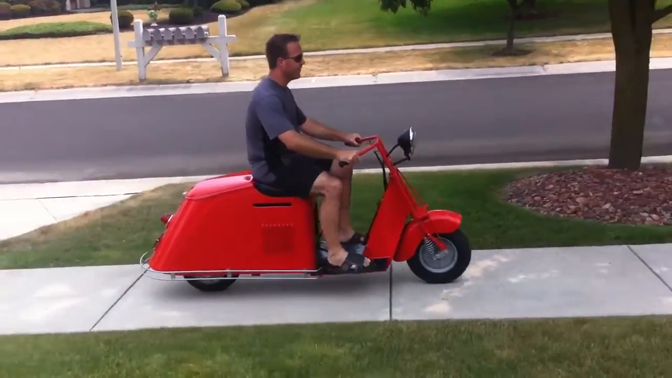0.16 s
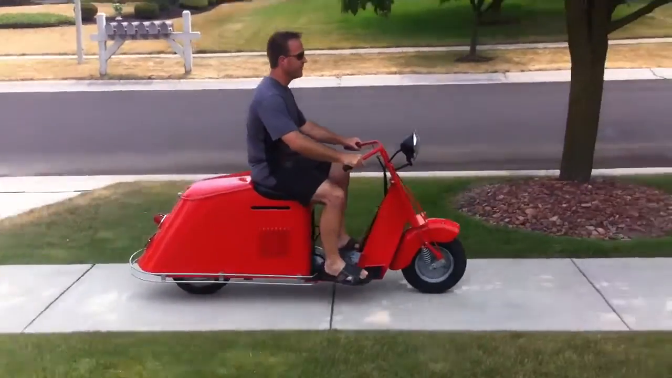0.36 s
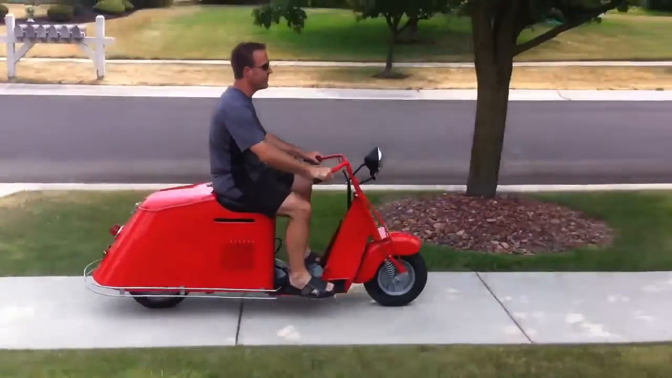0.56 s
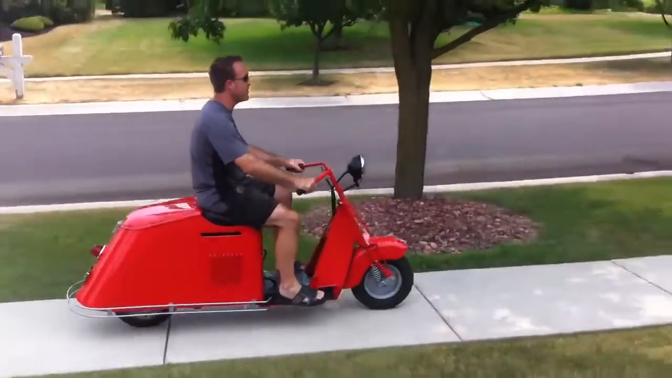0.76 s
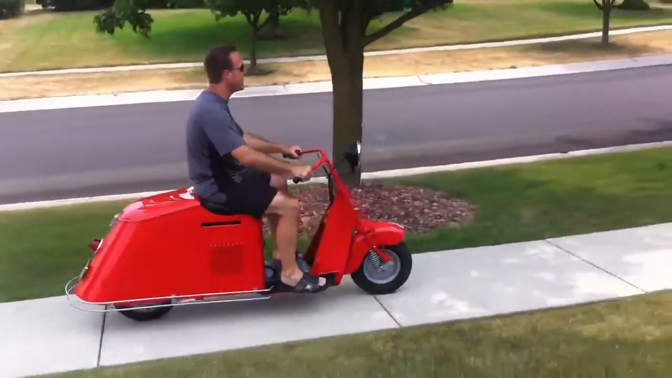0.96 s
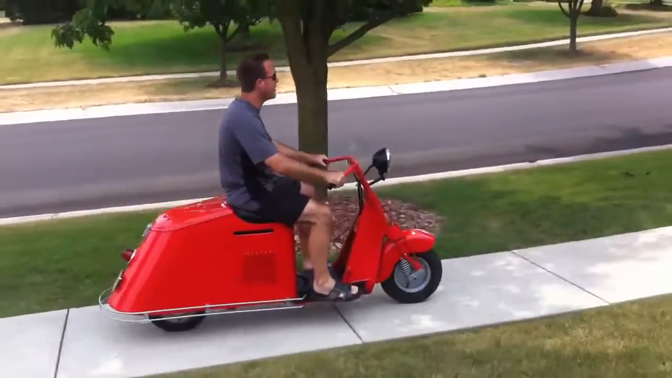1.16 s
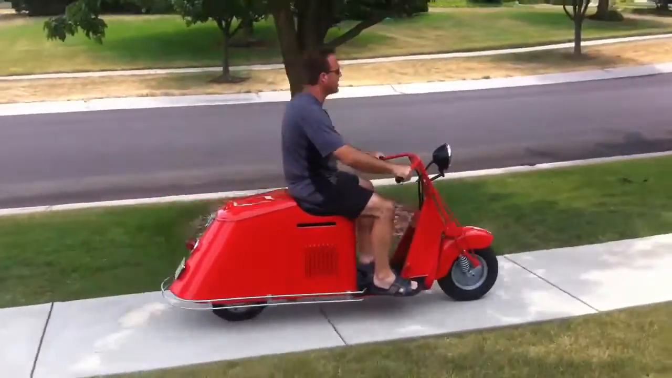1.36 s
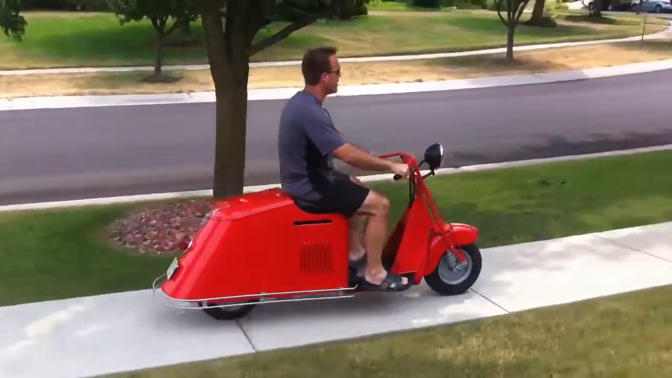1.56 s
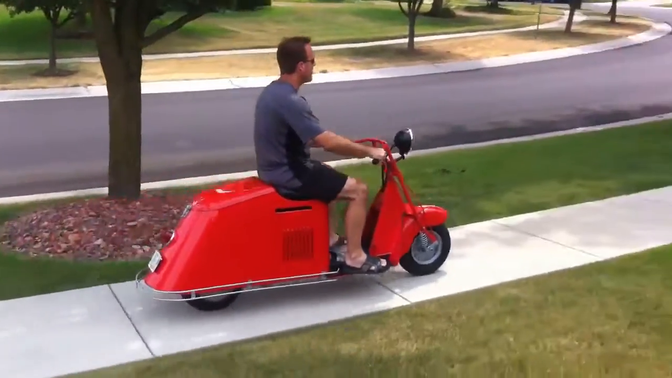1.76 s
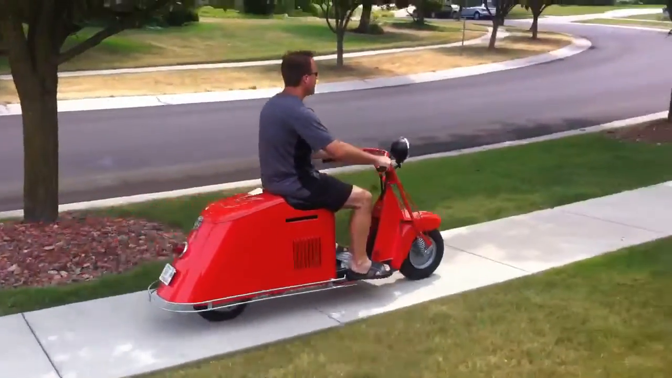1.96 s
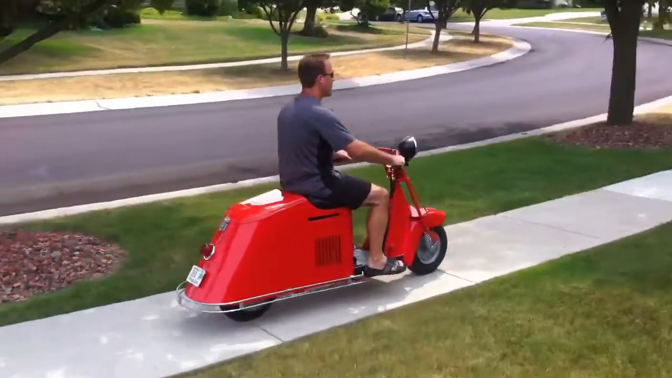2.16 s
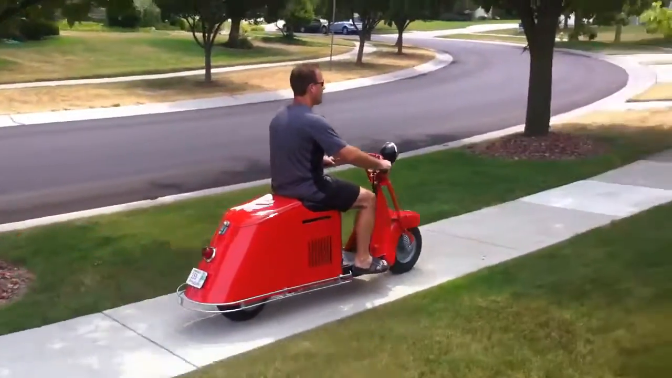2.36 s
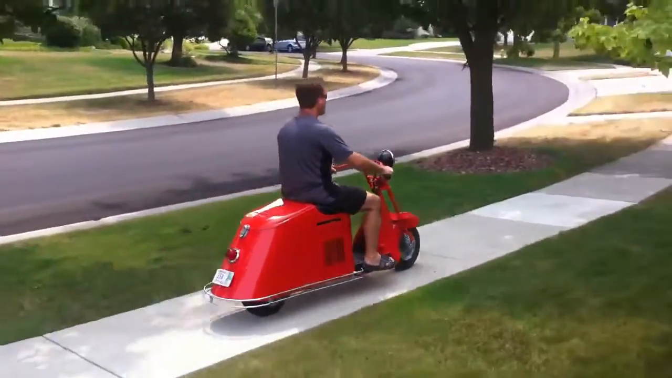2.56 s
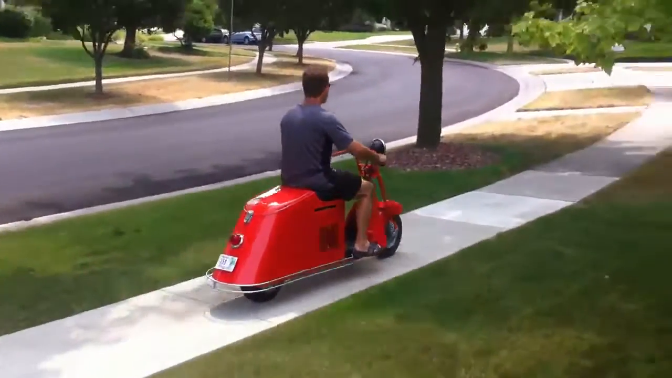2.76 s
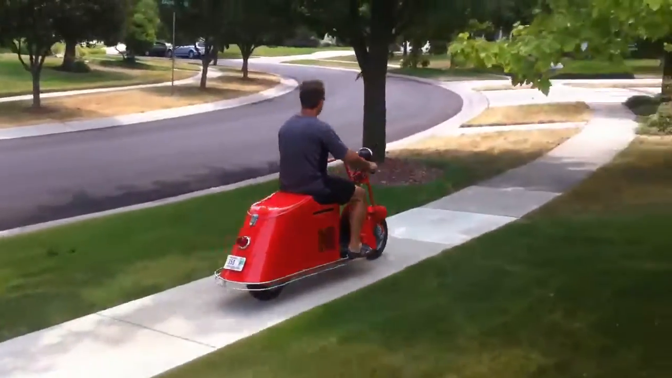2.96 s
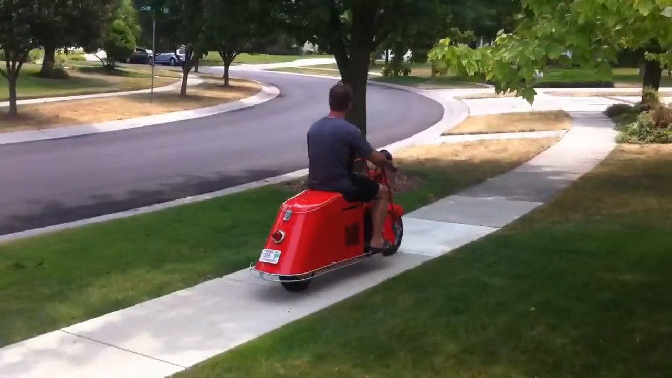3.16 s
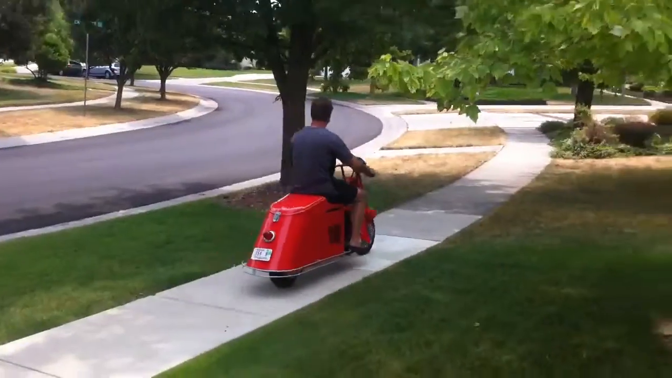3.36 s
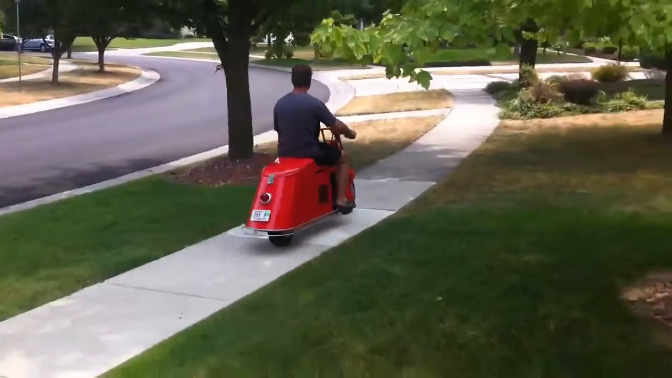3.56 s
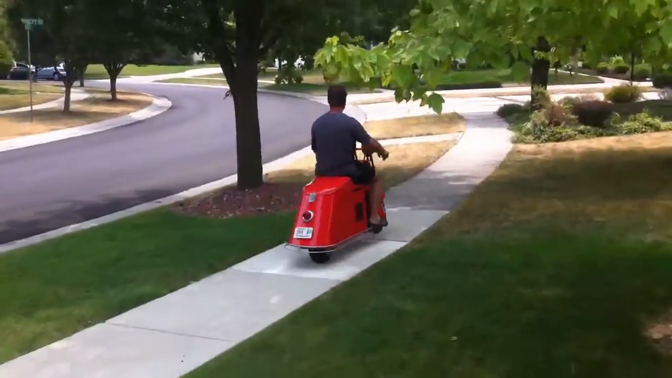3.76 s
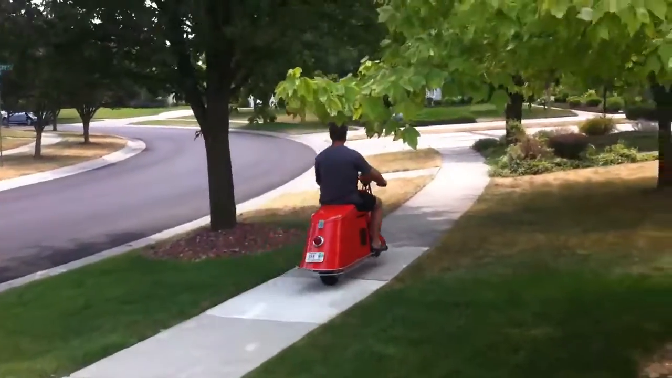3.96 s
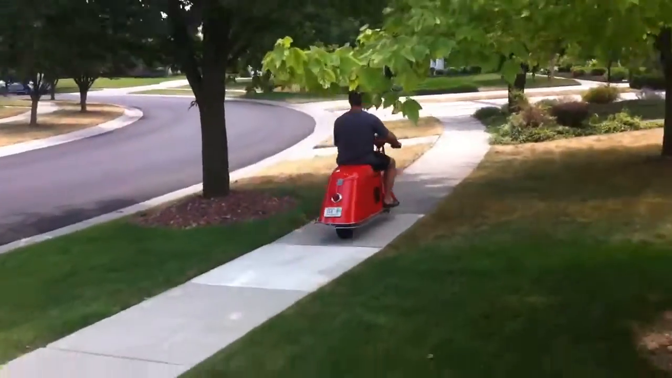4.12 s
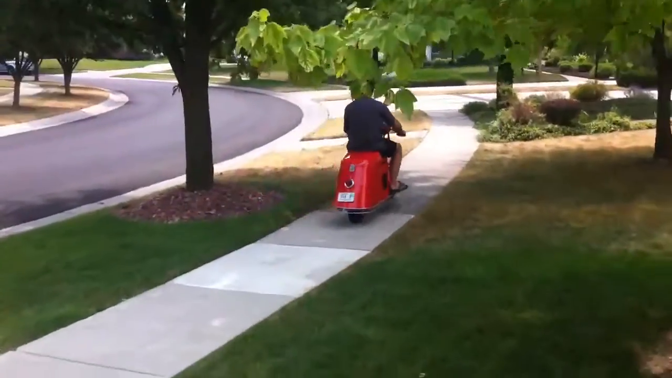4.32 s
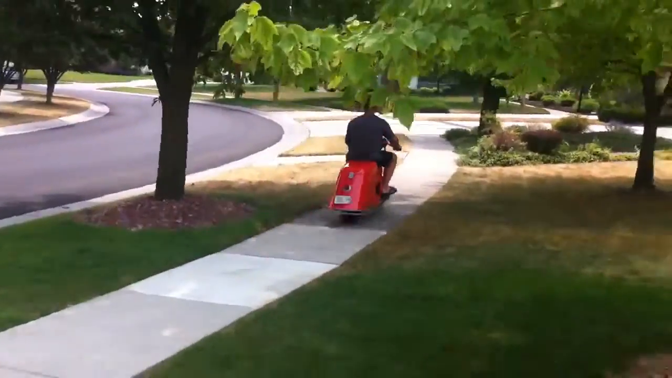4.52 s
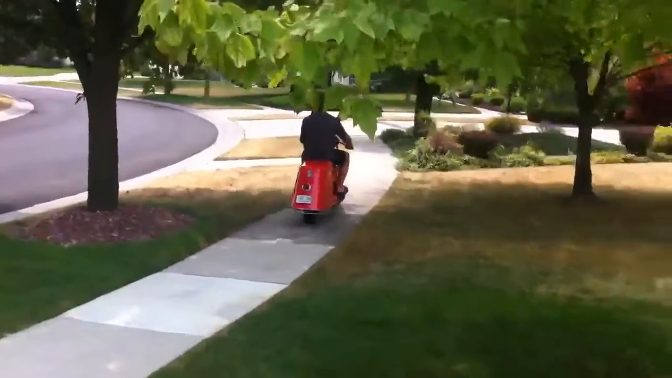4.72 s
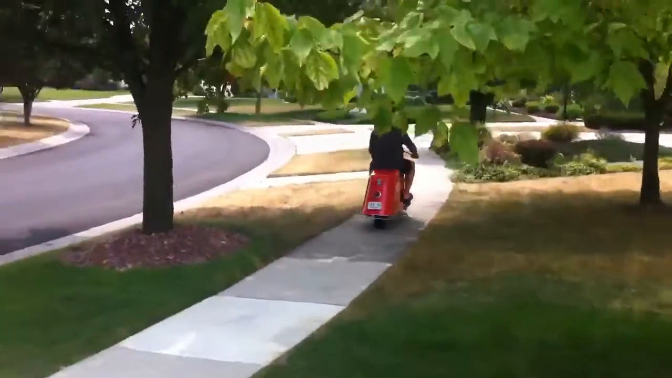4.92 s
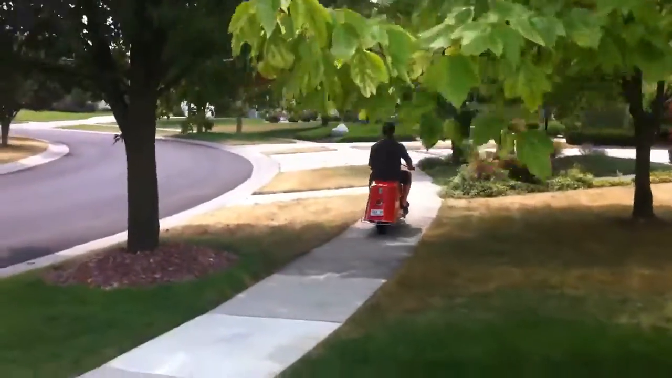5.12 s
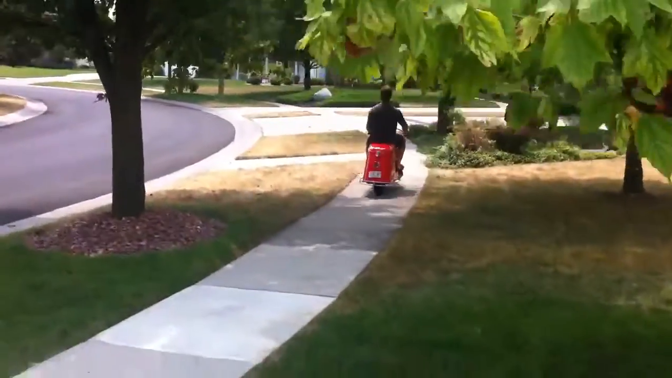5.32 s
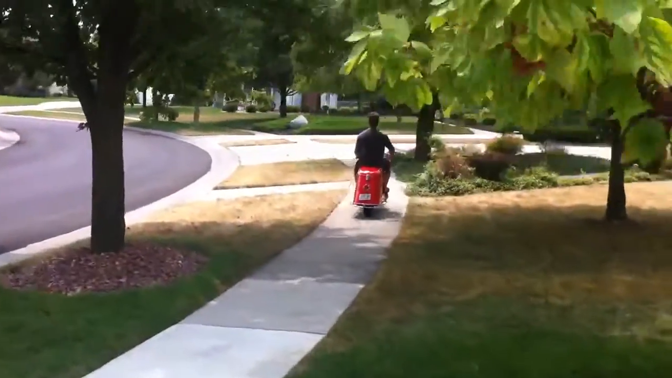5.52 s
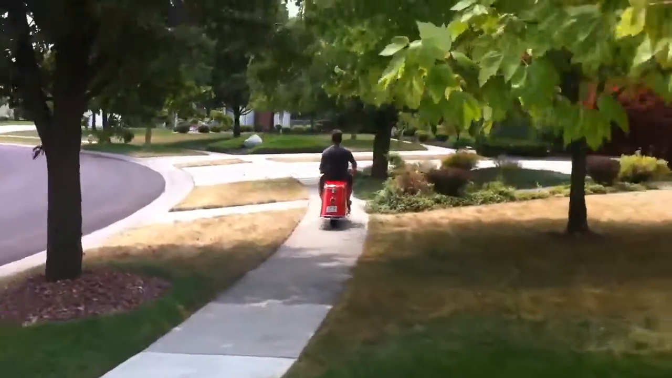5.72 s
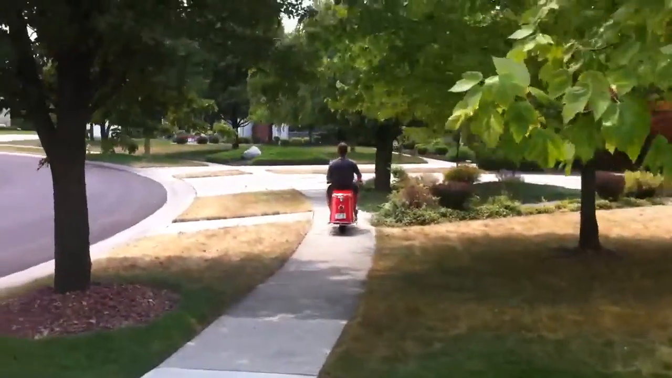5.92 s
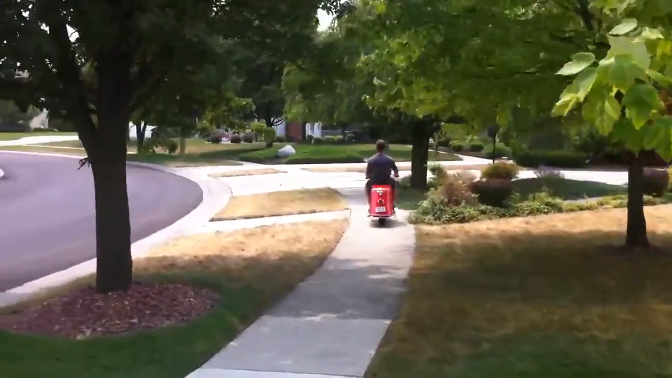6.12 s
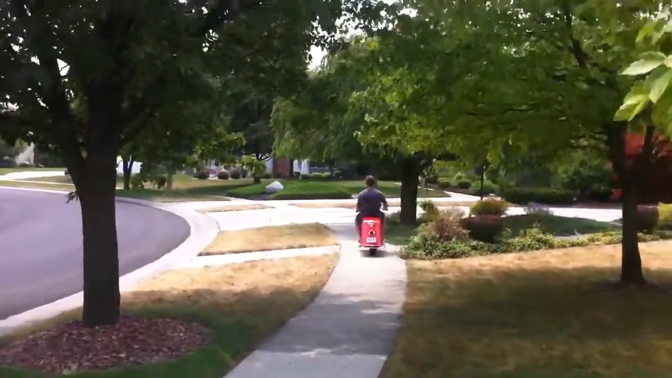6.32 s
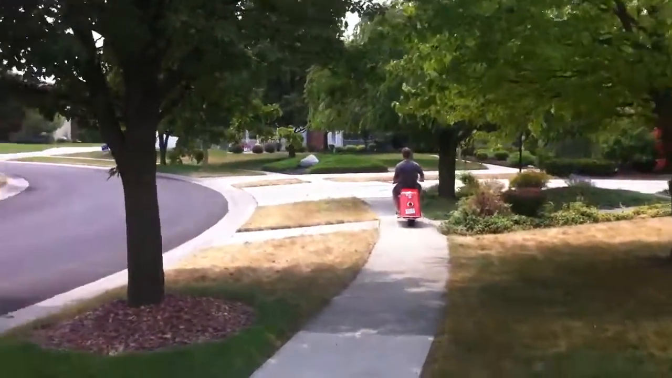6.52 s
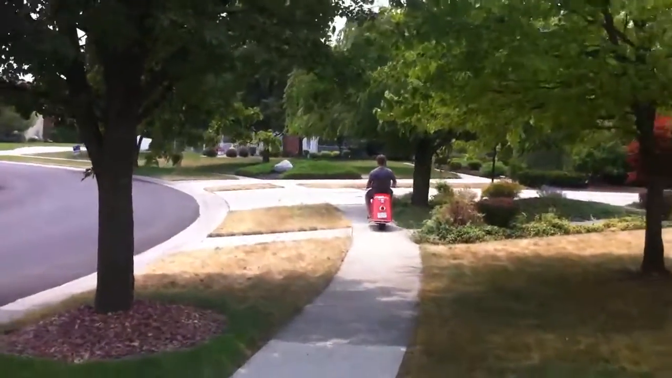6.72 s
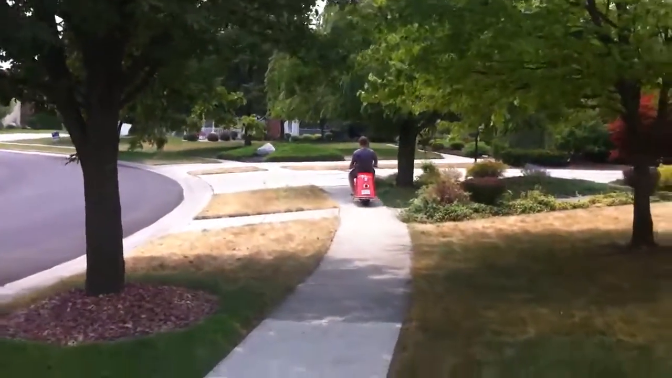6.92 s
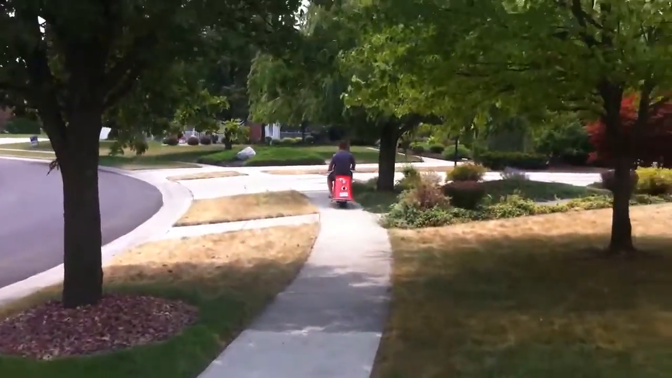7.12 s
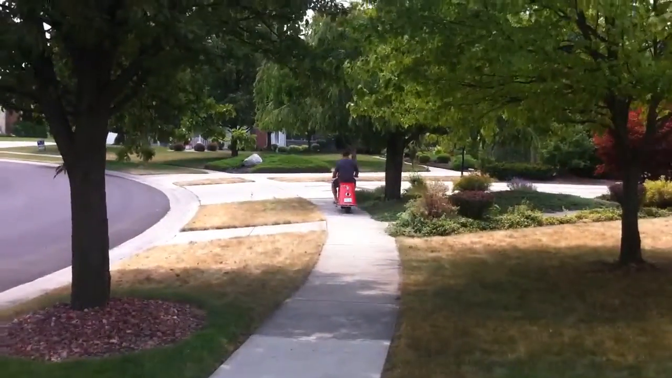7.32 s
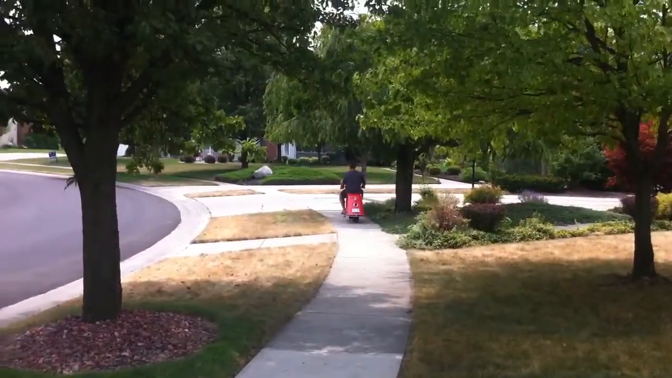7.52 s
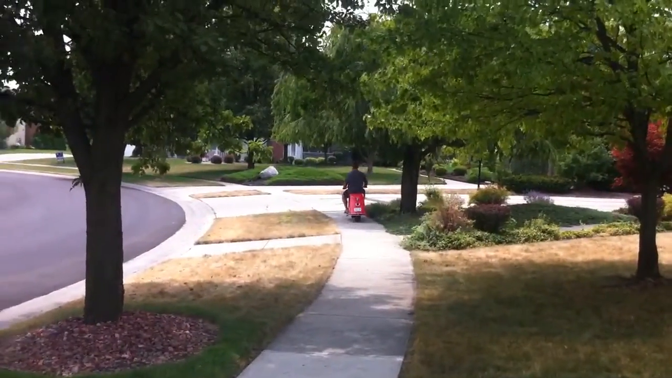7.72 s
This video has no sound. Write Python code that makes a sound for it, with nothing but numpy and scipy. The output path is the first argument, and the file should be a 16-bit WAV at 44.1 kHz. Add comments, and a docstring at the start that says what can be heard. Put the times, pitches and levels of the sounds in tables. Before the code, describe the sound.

A small single-cylinder four-stroke scooter putters close by on an outdoor path, at about ten exhaust pops a second, with ticking valve clatter and a soft intake gulp. A loose panel clinks lightly at about 0.7 and 1.3 seconds. From 1.5 to 4.3 seconds a faint, low chain hum rises in pitch. At 2.7 seconds a sharp, hollow knock bumps the hand-held microphone. From around 3.5 seconds the popping grows duller and quieter as the scooter rides away, keeping the same pace. The engine misfires between 5.3 and 5.7 seconds, again near 6.4, and around 7.4. Short, low puffs of wind flutter on the microphone around 6 seconds, then return with a thump at 7.3, among a few light handling knocks. A bird gives faint, high double chirps at 6.9 and 7.4 seconds. The distant engine is still puttering at the end, near 8 seconds.

```python
"""A garden path: a slow single-cylinder four-stroke scooter putters away from a hand-held camera.
Each cycle has an exhaust pop, a valve clatter and an intake gulp; late on the engine misfires.
The chain hums up with road speed and a loose panel clinks twice. The camera is knocked.
Near the end a bird chirps and puffs of wind flutter and thump the microphone port."""
import sys
import numpy as np
from scipy import signal
from scipy.fft import rfft, irfft, next_fast_len
from scipy.io import wavfile
from scipy.ndimage import uniform_filter1d

SR = 44100
rng = np.random.default_rng(int(sys.argv[2]) if len(sys.argv) > 2 else 0)


def dump_mix(stems):
    """Bounce the given channels to the path in sys.argv[1] as a 16-bit WAV at rate SR."""
    frames = np.atleast_2d(stems).T  # one column per channel
    limited = np.clip(frames, -1, 1)  # hard clip at full scale
    pcm = np.round(limited * 32767).astype(np.int16)
    wavfile.write(sys.argv[1], SR, pcm)


N = 343085

# crankshaft progress: (time [s], engine cycles completed [count])
CRANK_CYCLES = [(0.0422, 0), (.4517, 4), (.9627, 9), (1.4726, 14), (1.8801, 18), (2.1868, 21), (2.6992, 26),
                (2.9048, 28), (3.4205, 33), (4.2468, 41), (4.4509, 43), (4.5534, 44), (4.768, 46),
                (4.9768, 48), (5.176, 50), (5.384, 52), (5.8247, 56), (6.0308, 58), (6.2337, 60),
                (6.5524, 63), (6.7709, 65), (6.977, 67), (7.31, 70), (7.629, 73), (7.835, 75)]
# throttle, held open, then blipped: (time [s], opening [0-1])
THROTTLE_OPENING = [(0, 1), (5.2, 1), (5.3, 0), (5.6, 0.37), (5.74, 0.04), (5.85, 0.6), (6.25, 0.81),
                    (6.36, 0.25), (6.65, 0.28), (6.77, 0.97), (6.98, 0.78), (7.09, 0), (7.78, 0.27)]
# open-throttle pop: (time [s], thump [dB], gas crack [dB], crack pitch [Hz], pitch scatter [0-1])
EXHAUST_POP = [(0, -30, -31.5, 2200, 0.15), (.5, -27, -34.5, 2260, 0.17), (1.45, -27, -33, 2300, 0.17),
               (1.7, -29, -29, 1790, 0.31), (1.9, -28.5, -29.5, 1750, 0.01), (2.2, -27, -36.5, 2100, 0.15),
               (2.4, -28.5, -31.5, 2235, 0), (2.85, -27.5, -28.5, 2240, 0.09),
               (3.3, -27, -37.5, 2780, 0.05), (4.3, -29.5, -42.5, 2000, .25), (4.75, -31, -56, 1392, 0.2),
               (5.0, -29.5, -40, 1325, 0.13), (6.05, -33.5, -40, 1363, 0.14), (6.95, -35, -44, 1400, 0),
               (7.78, -31, -71, 1350, 0.1)]
# strong firings and misfires: (time [s], thump offset [dB], crack offset [dB])
ODD_FIRINGS = [(.656, -2, 3.5), (2.596, -2, 4.5), (3.11, 0.5, 3), (1.575, -3, 3), (2.39, 2.5, 3),
               (4.14, -0.5, -8), (5.285, -31, -35), (5.497, -23, -34), (5.713, -17, -40), (6.34, -5, -25),
               (6.447, -21, -39), (6.977, -2, 5), (7.198, 1, 15), (7.31, 1, -18), (7.414, -22, 8),
               (7.517, -13, -25), (7.63, -2, -10)]
# silencer bark: (time [s], level re thump [dB])
SILENCER_BARK = [(0, -6.5), (3.5, -13), (4.6, -7.5), (6.9, -20), (7.2, -27), (7.78, -21.5)]
# intake gulp: (time [s], gain [dB])
GULP_GAIN = [(0, -22), (2.5, -21.5), (4.35, -25.5), (4.55, -37), (5.2, -36), (7.78, -48.5)]

# ringing parts: (nominal frequency [Hz], level [dB], T60 [s])
EXHAUST_MODES = [(160, 5.5, 0.03), (319, -7, 0.022), (110, -8, 0.03)]
SILENCER_MODES = [(713, -1.5, 0.043), (936, -9.5, 0.035)]
INTAKE_MODES = [(260, -5, .009), (283, -8, 0.05), (272, -9, .09), (191, -17, 0.06)]
LOOSE_PANEL_MODES = [(5420, -4, .035), (5560, -11, .03), (6570, -9, .07), (4420, -14, .03),
                     (7980, -15, .05)]
THUD_MODES = [(390, -3, .04), (500, -7, .025), (310, -9, .03)]

# noise bands rumble, body, rattle, hiss: (edge [Hz])
BAND_EDGES_HZ = [0, 450, 1200, 4500, 22050]
# engine noise levels; the low swell at 7.3 s is a wind gust:
# (time [s], rumble [dB], body [dB], rattle [dB], hiss [dB])
ENGINE_AND_GUST_LEVELS = [(0.0, -37, -42.5, -42.5, -45.5), (1.18, -37.5, -42, -41, -45.5),
                          (2.49, -38, -44.5, -41.5, -44), (3.52, -39, -46, -44, -43),
                          (5.1, -40.5, -49, -46, -44.5), (6.1, -43, -48.5, -48, -48),
                          (6.85, -50.5, -51, -49.5, -51), (7.3, -40.5, -51, -48, -50.5),
                          (7.78, -49, -52, -51, -53)]
# shut-throttle offsets: (rumble [dB], body [dB], rattle [dB], hiss [dB])
BAND_SHUT_DB = [-4.5, -3.5, -5.0, -6]
# stroke surges re steady noise:
# (cycle position [0-1], rise [s], fall [s], rumble [dB], body [dB], rattle [dB], hiss [dB])
STROKE_SURGES = [(0, 0.0038, 0.012, -8, 4, 3, -0.5), (.29, 0.0065, 0.013, -18, -7.5, -2, -4.5),
                 (.62, 0.014, 0.0018, -9, -13, -40, -11)]
# engine noise colour from the side and from behind: (frequency [Hz], density [dB])
SIDE_SPECTRUM = [(40, -50), (110, -13), (180, -5.5), (300, -10.5), (520, -20.5), (720, -5), (1000, -5.5),
                 (1230, -14.5), (2360, -10), (4740, -17), (6120, -18), (7540, -23), (9000, -19),
                 (11000, -22), (13400, -32), (15500, -31)]
REAR_SPECTRUM = [(40, -39), (120, -7), (200, -0.5), (400, -20), (670, -0.5), (950, -14.5), (1300, -9),
                 (1650, -14), (2050, -9.5), (2450, -14), (3000, -12.5), (5400, -13), (7500, -19),
                 (8900, -18), (10000, -19), (15500, -24)]
# narrow peaks colouring the engine noise; from behind, the hollow tone of ground reflection:
# (centre [Hz], width [Hz], side gain [dB], rear gain [dB])
COLOUR_PEAKS = [(670, 35, -20, -7.5), (1001, 34, -7, -43), (1300, 210, -29, -4.5), (1630, 170, -4.5, -36),
                (2012, 78, -23, -4), (2477, 113, -10.5, 0), (3770, 113, -4.5, -11), (5420, 170, -11, -1),
                (5990, 550, -1, -13), (6520, 250, -8, -18), (8840, 530, -5.5, -4), (13600, 1060, 8, -17)]
# swell of the hiss near 9 kHz: (time [s], gain [dB])
SIZZLE_GAIN = [(3.3, -0.5), (3.7, 2), (4.4, 3.5), (4.8, -1)]

# chain hum: (time [s], tooth rate [Hz], level [dB])
CHAIN_HUM = [(1.1, 105, -66), (1.5, 114.1, -38), (1.8, 125.2, -40), (2.15, 137, -44.5), (2.4, 144, -36.5),
             (2.6, 152, -44), (2.8, 163, -45), (3.1, 168.3, -36.5), (3.35, 167.1, -39.5),
             (3.55, 191.7, -40.5), (3.75, 180.2, -52), (3.95, 192.2, -38.5), (4.25, 203.3, -46.5),
             (4.4, 206, -69)]
# loose panel taps: (time [s], level [dB])
PANEL_CLINKS = [(.7356, -27), (1.3452, -30)]
# camera knocks, plus the thud of a wind gust at 7.31 s: (time [s], thud [dB], tick [dB])
KNOCKS_AND_GUST = [(2.6984, -16, -12), (6.8385, -29, -18), (7.1565, -29, -38), (7.206, -32, -46),
                   (7.311, -32, -60), (7.492, -35, -48)]
# wind puffs: (centre time [s], length scale [s], centre pitch [Hz], level [dB])
WIND_PUFFS = [(5.845, 0.011, 204, -31), (5.91, 0.018, 167, -34), (6.107, 0.023, 181, -33.5),
              (7.10, 0.034, 149, -42), (7.144, 0.028, 183, -41), (7.211, .016, 195, -30),
              (7.23, 0.026, 189, -39), (7.28, 0.064, 171, -34.5), (7.311, 0.028, 240, -25),
              (7.333, 0.0066, 330, -31.5), (7.356, 0.013, 215, -32), (7.385, .03, 190, -42),
              (7.476, 0.028, 145, -39)]
# bird chirps: (time [s], length [s], start [Hz], middle [Hz], end [Hz], level [dB])
BIRD_CHIRPS = [(6.9, 0.027, 4350, 4650, 4750, -49), (6.941, 0.02, 4450, 4720, 4450, -44),
               (7.416, 0.03, 4160, 4740, 4340, -46.5), (7.459, 0.031, 4400, 4800, 4500, -47)]

SHUT_THUMP_DB, SHUT_CRACK_DB = -6.5, -16  # offsets at shut throttle
JITTER_S, THUMP_JITTER_DB, CRACK_JITTER_DB = 0.00025, 1, 0.5
PIPE_ECHO_S, SEAT_CYCLE_SHARE = 0.0062, 0.29
PIPE_ECHO_DB, SHELL_DB, SEAT_DB = -3.5, -15, -11  # re thump
VALVE_DB, TIN_DB = -4, -5.5  # re crack
PIPE_RING_HZ, PIPE_RING_DB, TIN_T60_S = 2400, -7, 0.061
SUCK_DB, VALVE_SHUT_S = -23, 0.0014
SIDE_TO_REAR_S = (1.39, 5.5)
YARD_T60_S, YARD_DB = 0.3, -18


def firings():
    """Firings set by crank and throttle: (time [s], thump [dB], crack [dB], crack pitch [Hz])."""
    crank_s, done = np.transpose(CRANK_CYCLES)
    late, thump_dev, crack_dev, pitch_dev = rng.standard_normal((int(done[-1]), 4)).T
    s = np.interp(np.arange(done[-1]), done, crank_s) + JITTER_S * late
    at = (s * SR).astype(int)
    thump_db, crack_db, crack_hz, scatter = (column[at] for column in curves(EXHAUST_POP))
    closure = throttle_closure()[at]
    thump_db = thump_db + SHUT_THUMP_DB * closure + THUMP_JITTER_DB * thump_dev
    crack_db = crack_db + SHUT_CRACK_DB * closure + CRACK_JITTER_DB * crack_dev
    for odd_s, thump_offset_db, crack_offset_db in ODD_FIRINGS:
        nearest = np.abs(s - odd_s).argmin()
        thump_db[nearest] += thump_offset_db
        crack_db[nearest] += crack_offset_db
    return np.c_[s, thump_db, crack_db, crack_hz * np.exp(scatter * pitch_dev)]


def throttle_closure():
    """Per sample: 0 open, 1 shut."""
    return 1 - curves(THROTTLE_OPENING)[0].clip(0, 1)


def cycles(fired):
    """Start and length [s] of each engine cycle, from one cycle before the first firing."""
    s = fired[:, 0]
    s = np.r_[2 * s[0] - s[1], s]
    return s, np.r_[np.diff(s), s[-1] - s[-2]]


def exhaust_pops(fired):
    """The exhaust valve opens: a pressure step, its return from the pipe end, a crack of gas."""
    out = np.zeros(N)
    lengths_s = cycles(fired)[1][1:]
    chance = rng.standard_normal((len(fired), 2))
    for (s, thump_db, crack_db, crack_hz), cycle_s, (tune, size) in zip(fired, lengths_s, chance):
        thump = -undb(thump_db) * ring(EXHAUST_MODES, 1 + 0.013 * tune)
        add(out, s, thump)
        add(out, s + PIPE_ECHO_S, undb(PIPE_ECHO_DB + size) * thump)
        # the silencer shell knocks at the pop and as the valve seats
        shell = undb(thump_db + SHELL_DB + 2 * size) * ring(SILENCER_MODES, 1 + 0.023 * tune)
        seat = undb(thump_db + SEAT_DB + 2 * tune) * ring(SILENCER_MODES, 1 + 0.038 * size)
        add(out, s + 0.00196, shell)
        add(out, s + SEAT_CYCLE_SHARE * cycle_s, seat)

        gas = rng.standard_normal(SR // 10)
        bark = unit_band(gas, hz=703, width_hz=630)
        bark_db = thump_db + np.interp(s, *np.transpose(SILENCER_BARK))
        add(out, s, undb(bark_db) * swell(0.001, 0.0094) * bark)

        jet = unit_band(gas, crack_hz, width_hz=300)
        pipe = unit_band(gas, PIPE_RING_HZ, width_hz=250)
        rush = unit_band(gas, hz=1730, width_hz=1600)
        burst = swell(0.0044, 0.0059)
        crack = burst * (jet + undb(PIPE_RING_DB) * pipe + undb(-4.5) * rush)
        add(out, s + 0.001993, undb(crack_db) * crack * burst.std() / crack.std())
        valve_snap = undb(crack_db + VALVE_DB) * swell(0.001, 0.0014) * rush
        add(out, s - 0.001, valve_snap)
        tin_modes = [(crack_hz, 0, TIN_T60_S), (PIPE_RING_HZ, PIPE_RING_DB, TIN_T60_S)]
        add(out, s + 0.0037, undb(crack_db + TIN_DB) * ring(tin_modes, 1 + 0.007 * tune))
    return out


def intake_gulps(fired):
    """Air rushes into the carburettor; the intake valve shuts softly and the throat rings."""
    out = np.zeros(N)
    starts_s, lengths_s = cycles(fired)
    chance = rng.standard_normal((len(starts_s), 2))
    for s, cycle_s, (tune, size) in zip(starts_s, lengths_s, chance):
        air = unit_band(rng.standard_normal(SR // 10), hz=11200, width_hz=6700)
        add(out, s + 0.58 * cycle_s, undb(SUCK_DB + size) * swell(0.0058, 0.011) * air)
        throat = ring(INTAKE_MODES, 1 + 0.025 * tune)
        rounded = uniform_filter1d(throat, int(VALVE_SHUT_S * SR), mode="constant")
        add(out, s + 0.635 * cycle_s, -undb(0.62 * size) * rounded)
    return undb(curves(GULP_GAIN)[0]) * out


def engine_noise(fired):
    """Gas and valve gear: four grainy noise bands surging on each stroke; a wind swell at 7.3 s."""
    starts_s, lengths_s = cycles(fired)
    angle_rad = np.interp(np.arange(N) / SR, SIDE_TO_REAR_S, (0, np.pi / 2))
    side, rear = np.cos(angle_rad), np.sin(angle_rad)
    closure = throttle_closure()
    levels_db = [db + shut_db * closure
                 for db, shut_db in zip(curves(ENGINE_AND_GUST_LEVELS), BAND_SHUT_DB)]
    rattle_db, hiss_db = levels_db[2:]
    # a weak firing shakes the engine less for the whole cycle
    crack_db = fired[:, 2]
    over_rattle_db = np.r_[crack_db[0], crack_db] - rattle_db[(starts_s.clip(0) * SR).astype(int)]
    shake_db = 0.3 * (over_rattle_db - 4.5).clip(-40, 5)
    out = np.zeros(N)
    for band, level_db in enumerate(levels_db):
        surge = stroke_surge(band, starts_s, lengths_s, shake_db)
        edges_hz = BAND_EDGES_HZ[band:band + 2]
        mix = side * noise(SIDE_SPECTRUM, *edges_hz) + rear * noise(REAR_SPECTRUM, *edges_hz)
        grain_db = 1.19 * wander(40) + wander(400)
        out += undb(level_db - 3.5 + grain_db) * surge * mix
    out += tappets(surge, hiss_db, rear)  # surge of the last band, the hiss
    out = add_colour_peaks(out, rear)
    sizzle = (undb(curves(SIZZLE_GAIN)[0]) - 1) * bandpass(out, hz=8900, width_hz=910)
    return out + sizzle


def stroke_surge(band, starts_s, lengths_s, shake_db):
    """Gain of one noise band: 1 plus a swell per stroke."""
    gain = np.ones(N)
    for share, rise_s, fall_s, *bands_db in STROKE_SURGES:
        chance = rng.standard_normal((len(starts_s), 2))
        for s, cycle_s, force_db, (late, size) in zip(starts_s, lengths_s, shake_db, chance):
            height = undb(bands_db[band] + force_db + 0.65 * size)
            add(gain, s + share * cycle_s + 0.0014 * late, height * swell(rise_s, fall_s))
    return gain


def tappets(surge, hiss_db, rear):
    """Tappets tick on the cooling fins at each stroke, loudest from the side."""
    ticks = (surge - 1) * undb(2.7 * wander(150).clip(-2, 2)) * rng.standard_normal(N)
    fins = bandpass(ticks, hz=6120, width_hz=1740, passes=2)
    return undb(hiss_db + 15.5 - 9.8 * rear) * fins


def add_colour_peaks(x, rear):
    """Narrow flickering peaks on the noise; from behind, the hollow tone of ground reflection."""
    out = x.copy()
    for hz, width_hz, side_db, rear_db in COLOUR_PEAKS:
        gain = undb(side_db + (rear_db - side_db) * rear ** 2 + 4.4 * wander(35))
        out += bandpass(gain * x, hz, width_hz)
    return out


def chain():
    """Links meet the sprocket teeth: a hum and its octave, wavering as the chain whips."""
    tooth_hz, db = curves(CHAIN_HUM)
    phase = 2 * np.pi * np.cumsum(tooth_hz * (1 + 0.012 * wander(20))) / SR
    waver_db = 3.3 * wander(25).clip(-3, 1)
    return np.sqrt(2) * undb(db + waver_db) * (np.sin(phase) + undb(-18) * np.sin(2 * phase))


def panel_clinks():
    """A loose panel taps the frame."""
    out = np.zeros(N)
    for s, db in PANEL_CLINKS:
        add(out, s, undb(db) * ring(LOOSE_PANEL_MODES))
    return out


def knocks_and_gust():
    """Camera knocks and one wind thump: each a tick, then a hollow thud."""
    out = np.zeros(N)
    for s, thud_db, tick_db in KNOCKS_AND_GUST:
        add(out, s, undb(tick_db) * ring([(4200, 0, 0.0016)]))
        add(out, s + 0.00137, -undb(thud_db) * ring(THUD_MODES))
    return out


def wind_puffs():
    """Short, low, rough-edged flutters of air pressure at the microphone port."""
    out = np.zeros(N)
    for s, length_s, hz, db in WIND_PUFFS:
        t = np.arange(-2 * length_s, 2 * length_s, 1 / SR)
        flutter = np.cos(2 * np.pi * hz * t * (1 + 3 * t))
        flutter += 0.3 * (flutter ** 2 - 0.5)  # the port flaps unevenly
        rough = bandpass(rng.standard_normal(len(t)), hz=340, width_hz=95)
        envelope = undb(db) * np.exp(-4 * (t / length_s) ** 2)
        add(out, s - 2 * length_s, envelope * (flutter + 0.15 * rough / rough.std()))
    return out


def bird(warble_hz=133, depth_hz=91):
    """Whistled chirps bending through three pitches, with a quick warble."""
    out = np.zeros(N)
    for s, length_s, start_hz, middle_hz, end_hz, db in BIRD_CHIRPS:
        progress = np.linspace(0, 1, int(length_s * SR))
        warble = np.sin(2 * np.pi * warble_hz * length_s * progress)
        hz = np.interp(progress, (0, 0.5, 1), (start_hz, middle_hz, end_hz)) + depth_hz * warble
        envelope = undb(db + 2.05 * warble) * np.sin(np.pi * progress) ** 0.26
        add(out, s, envelope * np.sin(2 * np.pi * np.cumsum(hz) / SR))
    return out


def breeze():
    """Light air on the microphone port: a faint lumpy rumble, freshening twice near the end."""
    gust_db = np.interp(np.arange(N) / SR, (5.0, 5.9, 6.5, 7.2, 7.6), (-77, -55, -70, -54, -60))
    gain = undb(gust_db + 3.5 * wander(8.3))
    return gain * noise([(20, -18), (60, -5), (100, 9)], lo_hz=27, hi_hz=120)


def yard_echo(x, gap_s=0.012):
    """Short diffuse echo from houses and trees."""
    t = np.arange(SR // 2) / SR
    tail = rng.standard_normal(len(t)) * undb(-60 * t / YARD_T60_S) * (t > gap_s)
    return undb(YARD_DB) * signal.fftconvolve(x, tail / np.sqrt(np.sum(tail ** 2)))[:N]


def undb(db):
    """dB to gain."""
    return 10 ** (np.asarray(db) / 20)


def curves(table):
    """Columns after the time column, interpolated per sample."""
    s, *columns = np.transpose(table)
    return [np.interp(np.arange(N) / SR, s, column) for column in columns]


def add(out, s, x):
    """Mix x in at time s."""
    i = int(s * SR)
    if 0 <= i < N:
        out[i:i + len(x)] += x[:N - i]


def ring(modes, pitch_ratio=0.98):
    """Sum of decaying partials."""
    t = np.arange(SR // 8) / SR
    return sum(undb(db - 60 * t / t60_s) * np.sin(2 * np.pi * hz * pitch_ratio * t)
               for hz, db, t60_s in modes)


def swell(rise_s, fall_s):
    """Smooth rise, exponential fall, peak 1."""
    t = np.arange(SR // 10) / SR
    return np.where(t < rise_s, np.sin(np.pi / 2 * t / rise_s) ** 2, np.exp((rise_s - t) / fall_s))


def noise(spectrum, lo_hz, hi_hz):
    """One band of coloured noise, rms 1."""
    size = next_fast_len(N)
    hz = np.arange(size // 2 + 1) * SR / size + 1e-3
    knots_hz, db = np.transpose(spectrum)
    shape = undb(np.interp(np.log(hz), np.log(knots_hz), db)) * (hz >= lo_hz) * (hz < hi_hz)
    x = irfft(shape * rfft(rng.standard_normal(size)), size)[:N]
    return x / x.std()


def wander(rate_hz):
    """Slewed random steps, spread near 1."""
    hold = int(SR / rate_hz)
    return uniform_filter1d(np.repeat(rng.standard_normal(N // hold + 1), hold), hold)[:N]


def bandpass(x, hz, width_hz, passes=1):
    """Resonator, gain 1 at the centre; width per pass."""
    for _ in range(passes):
        x = signal.lfilter(*signal.iirpeak(hz, hz / width_hz, fs=SR), x)
    return x


def unit_band(x, hz, width_hz):
    """Two band-pass stages, output rms 1."""
    band = bandpass(x, hz, width_hz, passes=2)
    return band / band.std()


def scene():
    """Mono mix; only pops, gulps, clinks and bird feed the echo."""
    fired = firings()
    direct = exhaust_pops(fired) + intake_gulps(fired) + panel_clinks() + bird()
    outdoors = direct + yard_echo(direct) + engine_noise(fired) + chain()
    return (outdoors + knocks_and_gust() + wind_puffs())[None]


def record(dry, low_cut_hz=105, high_cut_hz=15700):
    """Microphone: bass cut, then breeze rumble added, then top cut."""
    highpass = signal.butter(3, low_cut_hz, "high", fs=SR, output="sos")
    lowpass = signal.ellip(12, 0.2, 70, high_cut_hz, fs=SR, output="sos")
    return signal.sosfilt(lowpass, signal.sosfilt(highpass, dry) + breeze())


dry = scene()
out = record(dry)
dump_mix(out)
```